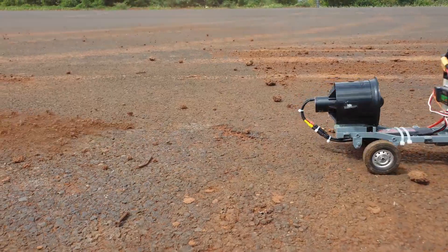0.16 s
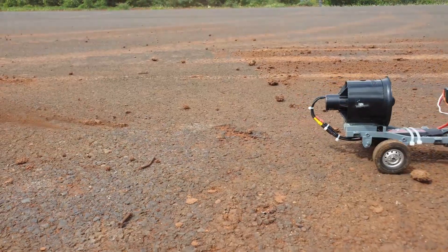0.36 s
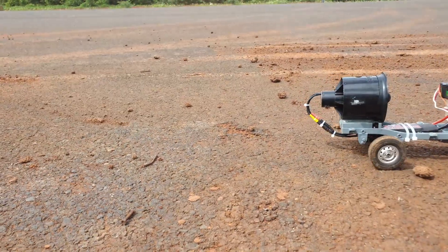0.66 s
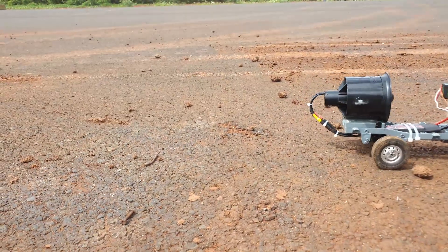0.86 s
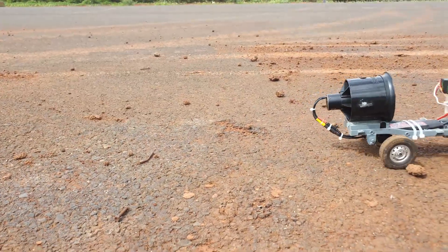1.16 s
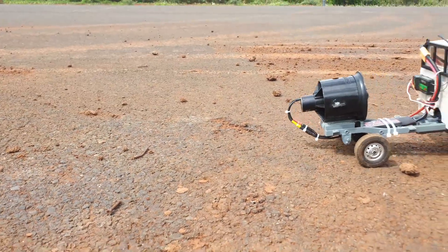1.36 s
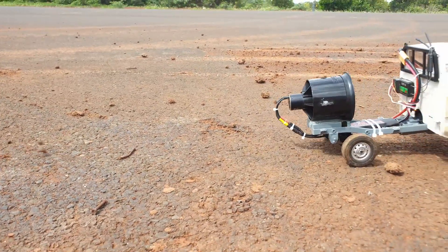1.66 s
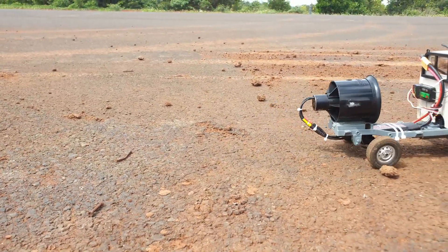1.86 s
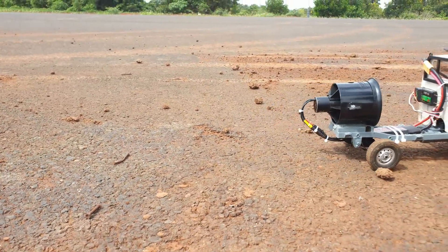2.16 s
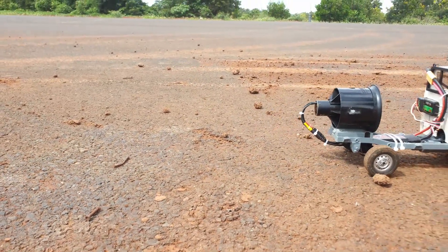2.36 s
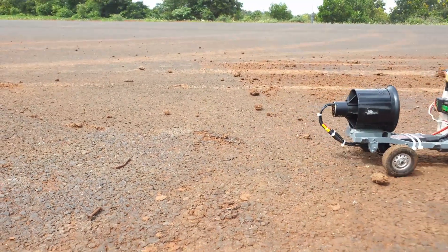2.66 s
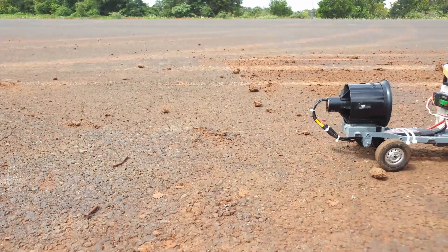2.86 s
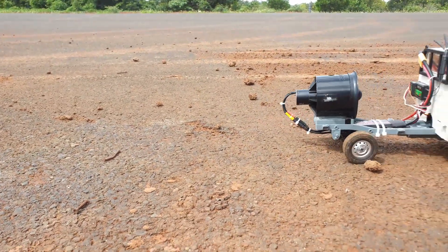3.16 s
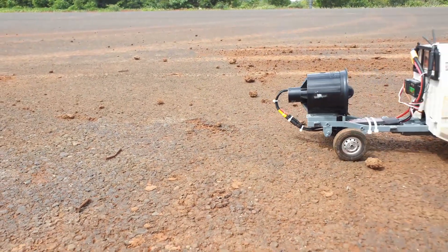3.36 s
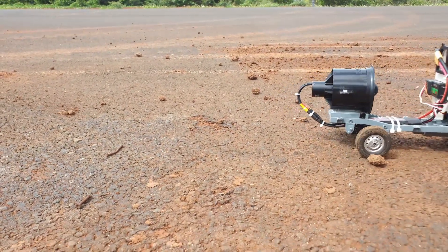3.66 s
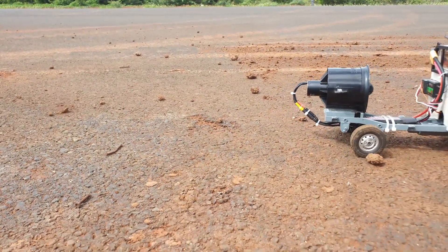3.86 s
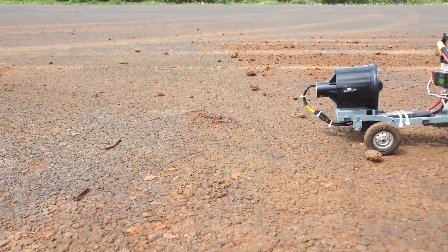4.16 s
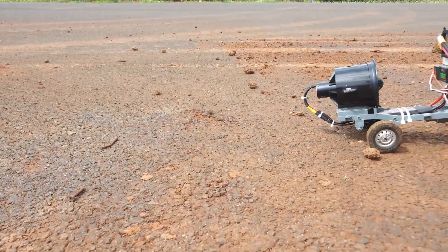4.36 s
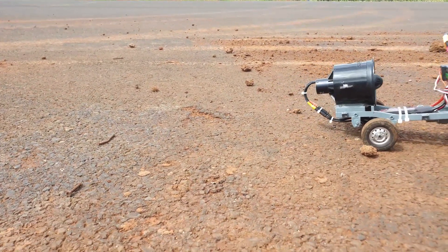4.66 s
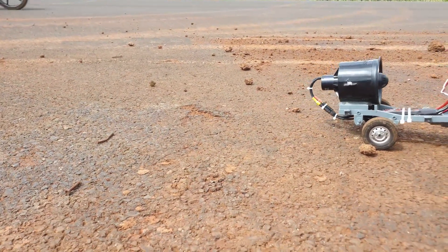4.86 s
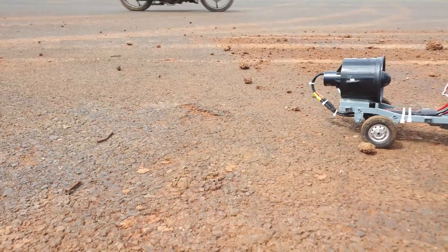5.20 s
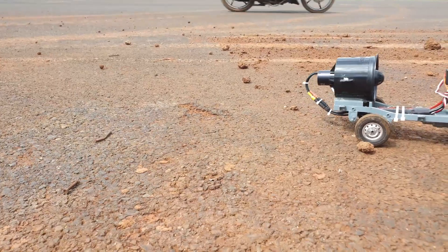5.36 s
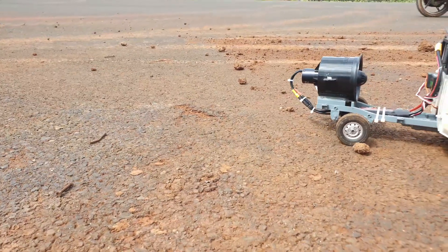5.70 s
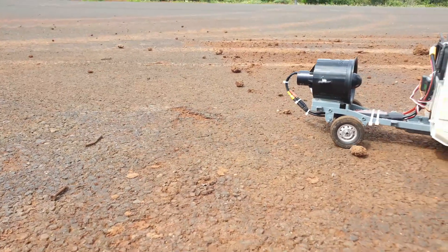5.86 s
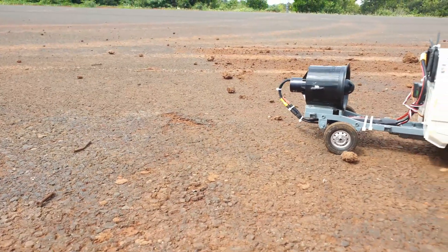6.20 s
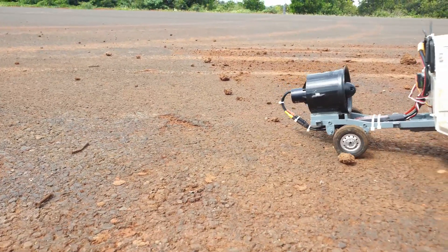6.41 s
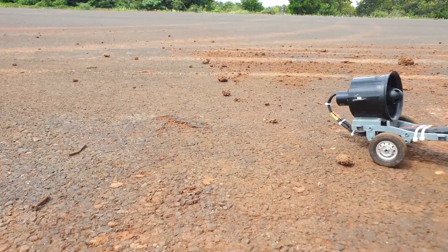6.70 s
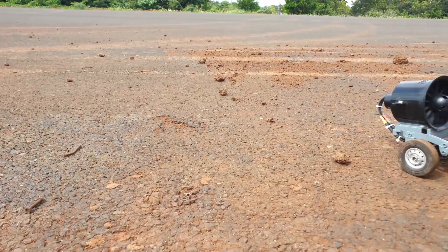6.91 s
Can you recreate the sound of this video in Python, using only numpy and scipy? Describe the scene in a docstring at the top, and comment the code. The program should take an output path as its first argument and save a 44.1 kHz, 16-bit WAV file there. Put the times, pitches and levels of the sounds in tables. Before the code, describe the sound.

A small electric ducted fan close by whines up three times to a piercing rushing pitch and winds down, as a motorbike thumps past outdoors.

```python
"""Open ground: a model car's twelve-blade electric ducted fan is throttled up three times, close by.
Blade tones and shaft orders sweep through the duct's resonances over rushing air (shaped noise), and the motor
bearings whirr. At part throttle the speed controller whistles: a steady sine with a moving sideband.
A single-cylinder motorbike, made of filtered firing pulses and hiss, thumps past behind the fan.
Short bursts of filtered noise make the grit that ticks, mostly as the fan runs down."""
import sys
import numpy as np
from scipy import signal
from scipy.fft import rfft, irfft
from scipy.io import wavfile

SR = 44100
rng = np.random.default_rng(int(sys.argv[2]) if len(sys.argv) > 2 else 0)


def digitize_waveform(pressure):
    """Quantize a signal to 16-bit integers and store it at the path in sys.argv[1].

    Rows of a 2-D input are taken as channels; values are limited to [-1, 1].
    """
    field = np.atleast_2d(pressure).T
    bounded = np.clip(field, -1, 1)
    quanta = np.round(bounded * 32767).astype(np.int16)
    wavfile.write(sys.argv[1], SR, quanta)


N = 310464
TIME = np.arange(N) / SR

# open air, before a slow wander: pitch_hz, left_db per Hz, right_db per Hz, correlation (left-right)
OPEN_AIR_SPECTRUM = [(20, -108, -110, .6), (55, -73, -76.5, 0.86), (119, -79, -81.5, 1),
                     (330, -88.5, -89.5, 0.47), (627, -93, -102.5, 0.7), (900, -91.5, -101.5, 0.48),
                     (1400, -102, -113, 0.49), (2200, -94.5, -107.5, 0.9), (3280, -113, -113, 0.34),
                     (5000, -112, -112, 0.25), (8000, -118, -118, .2), (15000, -120, -120, 0.23)]

# motorbike engine speed: time_s, firings_hz
BIKE_FIRING_RATE = [(0, 16), (4.15, 15.3), (4.45, 13.9), (4.9, 13.4), (6.05, 12.65), (6.35, 11.35),
                    (6.9, 12.5)]
# rise and fall of the bike's tyre and chain hiss: time_s, gain_db
BIKE_HISS_GAIN = [(0, -24), (3.2, -6.5), (4.5, 10.5), (5.5, 4.5), (5.9, -2), (6.25, -9.5), (6.4, -17.5),
                  (6.6, -18.5), (7.04, -20)]
# colour of that hiss, before its gain: pitch_hz, left_db per Hz, right_db per Hz, correlation (left-right)
BIKE_HISS_SPECTRUM = [(200, -90, -85.5, 0.65), (600, -84.5, -91, 0.79), (1000, -79.5, -82, 0.38),
                      (2146.4, -83.5, -93, 0.16), (3100, -94.5, -95.5, 0.3), (4670, -111.5, -86.5, 0.38),
                      (7500, -101, -101, 0.16), (11700, -96, -87.5, .3), (15000, -99, -93.5, .3)]

# grit under the wheels: start_s, peak_db, centre_hz, decay_s
GRIT_TICKS = [(5.549, -44, 11870, .004), (6.262, -48, 10930, 0.0036), (6.371, -50.5, 6940, .003),
              (6.792, -37.5, 7060, 0.0018), (6.830, -47, 7000, 0.0016), (6.866, -54, 2100, .005),
              (6.875, -48, 2100, 0.0083), (6.877, -45, 6000, 0.0035), (6.904, -49, 12000, .004),
              (6.942, -58, 1630, .008)]

# controller chopping at part throttle: start_s, end_s, left_db, right_db (carrier peak, before its wander)
CHOPPING_SPELLS = [(-.02, 0.173, -69, -37.5), (1.387, 1.67, -48, -39), (3.145, 3.472, -59, -39.5),
                   (5.24, 5.38, -55, -42)]

# motor bearings ringing the housing: centre_hz, width_hz (first of two passes), level_db (relative)
HOUSING_MODES = [(1041, 710, -7), (1886, 50, -2.5), (2464, 250, -3), (5200, 1800, -12.5)]

# throttle bursts: opens_s, full_s, eases_s, opening_rate (Hz per s), closing_s,
# octave_db (hum's octave at full speed), high_rush_db (treble gain); surge adds to both levels
THROTTLE_BURSTS = [(-.269, .186, .954, 792, .368, -37, -5), (1.291, 1.665, 2.528, 930, .382, -37.5, -7.5),
                   (3.101, 3.45, 5.185, 1037, .451, -38, -6.5)]
# the battery sags under load, one curve a burst: time_s, pitch_hz (second blade tone asked for at full throttle)
BATTERY_SAG = [
    [(0.27, 10454), (0.348, 10531), (0.564, 10484), (0.71, 10541), (0.96, 10444)],
    [(1.73, 10448), (1.972, 10473), (2.54, 10432)],
    [(3.52, 10446), (3.668, 10473), (4.22, 10393), (5.2, 10357)],
]

# rushing air at full speed, before gains: pitch_hz, left_db per Hz, right_db per Hz, correlation (left-right)
RUSH_SPECTRUM = [(30.16, -103, -105, .45), (100, -74, -78, 0.6), (272, -83.5, -83, -0.12),
                 (574, -75, -80.5, 1), (750, -71.5, -73.5, 0.3), (1100, -70.5, -76, 0.97),
                 (1740, -67.5, -79.5, 0.78), (2197, -75.5, -79, 0.46), (2900, -81.5, -79, 1),
                 (3295, -68, -65.5, .93), (3650, -67, -63.5, 0.43), (5000, -71.5, -63, 0.65),
                 (6620, -74.5, -62.5, -0.36), (8000, -71, -67, -0.4), (9940, -61, -61.5, -0.38),
                 (12160, -62.5, -60, -0.35), (15200, -68.5, -68, .3)]

# how well the duct radiates a tone: pitch_hz, gain_db
DUCT_RESPONSE = [(200, -10.5), (430, 10), (1000, 25), (1500, 18), (2400, 18), (3400, 12.5), (4200, 14),
                 (5200, 8), (6300, 2), (8000, -8), (9300, 6), (10400, 18.5), (11500, -1.5), (13000, 8.5),
                 (15600, -1.5)]
# overtones of the slightly unequal blades at full speed: shaft_order, left_db, right_db
BUZZ_ORDERS = [(3, -46.5, -47.5), (4, -51.5, -50), (5, -47, -48.5), (6, -51, -49.5), (7, -47.5, -50.5),
               (8, -42, -36), (9, -46, -41.5), (10, -52.5, -54.5), (11, -46, -39), (13, -41.5, -39),
               (14, -57.5, -47), (15, -45.5, -43.5), (18, -57.5, -50), (23, -33, -34), (25, -40, -36.5),
               (26, -50.5, -43), (27, -48, -40.5), (28, -54, -46.5), (30, -58.5, -43)]
# hum at the shaft rate, one curve a burst: time_s, level_db (at full speed, midway between the ports)
SHAFT_HUM = [
    [(0.27, -33), (0.744, -38), (0.78, -37), (0.96, -36)],
    [(1.73, -36), (2.096, -40.5), (2.42, -38.5), (2.54, -38)],
    [(3.52, -35.5), (3.782, -37.5), (3.88, -33.5), (5.2, -32)],
]
# blade tones are beamed unevenly as the car shifts, one curve a burst:
# time_s, level_db (at full speed, before the trim in BLADE_TONE_SETTINGS), pan_db (left minus right)
FIRST_BLADE_BEAM = [
    [(0.24, -30.5, 0), (0.312, -34.5, 2.5), (0.462, -39, 4), (0.524, -32, -9), (0.598, -45, 7),
     (0.97, -28.5, -4.5)],
    [(1.71, -28.5, -11), (1.752, -39.5, -6.5), (1.958, -20.5, -17), (2.116, -27.5, -10.5),
     (2.274, -25, -10.5), (2.54, -29.5, -8.5)],
    [(3.49, -35.5, -6.5), (3.566, -28, -3.5), (3.936, -25, -6.5), (4.408, -35, 4), (4.952, -23.5, -24),
     (5.2, -33.5, -2.5)],
]
SECOND_BLADE_BEAM = [
    [(0.26, -17, -2.5), (0.352, -21, -13), (0.406, -15.5, -8), (0.56, -20.5, -6), (0.658, -19, -9),
     (0.824, -19.5, -5.5), (0.97, -19.5, -14)],
    [(1.73, -20, -8.5), (1.776, -22.5, -12), (1.862, -25, -16), (1.952, -21, -21.5), (2.094, -24, -8.5),
     (2.194, -23, -9), (2.54, -17.5, -4)],
    [(3.51, -26, 5), (3.618, -22, -3), (3.734, -22.5, -3.0), (3.998, -24, 11.0), (4.216, -23, 2.0),
     (4.564, -22, -4), (5.2, -19, 0)],
]
THIRD_BLADE_BEAM = [
    [(0.27, -41, -2.5), (0.582, -41.5, -1), (0.64, -59.5, -6), (0.96, -44, -5.5)],
    [(1.73, -44.5, -10), (2.08, -45, -7), (2.168, -44.5, -3), (2.54, -44, -12.5)],
    [(3.52, -48, -5), (4.342, -27.5, 5.5), (4.89, -37.5, -5), (5.2, -42, -10)],
]
# the three blade tones: lead_rad (phase lead at the left port), trim_db (when beamed), even_db (when spread evenly)
BLADE_TONE_SETTINGS = [(1.94, -1.6, -31.5), (-0.558, 0.45, -14), (-.3, .5, -48)]

# full speed is in shaft turns per second; the controller chops at CHOP_HZ; a steep low-pass cuts at TOP_HZ
BLADES, FULL_HZ, CHOP_HZ, TOP_HZ = 12, 435, 8000, 15850
# the rotor: lag behind the throttle, air drag (Hz per s, per Hz squared) and bearing friction
SPOOL_S, DRAG, FRICTION_HZ_PER_S = .0177, .021, 12
# freshly started air is rough and loud, then settles
SETTLE_S, SURGE_HUM_DB, SURGE_LOW_DB, SURGE_HIGH_DB = 0.16, 0.5, 1.8, 1
# shaft speeds between which the blade tones narrow into beams
EVEN_HZ, BEAMED_HZ = 199, 304
# the fan is off to the right, so it reaches the left port late
PORT_LAG_S = .000133
# the bike's pass: when nearest, speed, distance then, thump level then, extra level straight behind it
PASS_S, BIKE_M_PER_S, ROAD_M, EXHAUST_DB, ASTERN_DB = 5.24, 6.7, 5.64, -42.5, 3
# exhaust loss over open ground for each tenfold distance
FALL_DB = 34.5
# the rider lifts off for a moment
LIFT_S, LIFT_LENGTH_S, LIFT_DB = 6.28, 0.12, -5.5


def undb(db):
    """Decibels to gain."""
    return 10 ** (np.asarray(db) / 20)


def stereo(left, right):
    """Left and right settings stacked to apply across time."""
    return np.array([[left], [right]])


def unit(x):
    """Scale to rms 1."""
    return x / np.sqrt(np.mean(x ** 2))


def curves(table):
    """The columns of a timed table, one value per sample."""
    s, *columns = np.transpose(table)
    return np.array([np.interp(TIME, s, c) for c in columns])


def joined(bursts):
    """One curve a burst, joined into columns with a value per sample."""
    return curves([row for burst in bursts for row in burst])


def colour(table, hz):
    """The columns of a spectrum, read on a log-frequency axis."""
    points, *columns = np.transpose(table)
    return np.array([np.interp(np.log(hz + 1), np.log(points), c) for c in columns])


def walk(rate):
    """A random wander through this many points a second; spread near 1."""
    steps = TIME * rate
    return 1.2 * np.interp(steps, np.arange(12000), rng.standard_normal(12000))


def band(x, hz, width):
    """A resonance with gain 1 at its centre."""
    centre = min(hz, .45 * SR)
    sharpness = hz / min(width, .4 * SR)
    return signal.lfilter(*signal.iirpeak(centre, sharpness, fs=SR), x)


def air(table):
    """Stereo noise with the given density and correlation, mixed from independent mid and side."""
    left_db, right_db, alike = colour(table, np.fft.rfftfreq(N, 1 / SR))
    alike = np.clip(alike, -.98, .98)
    mid, side = rfft(rng.standard_normal((2, N))) * np.sqrt([1 + alike, 1 - alike])
    left = (mid + side) * undb(left_db)
    right = (mid - side) * undb(right_db)
    return irfft(np.array([left, right]), N) * np.sqrt(SR) / 2


def left_late(x):
    """Delay the left channel by the path between the ports."""
    delay = np.exp(-2j * np.pi * np.fft.rfftfreq(N, 1 / SR) * PORT_LAG_S)
    return np.array([irfft(rfft(x[0]) * delay, N), x[1]])


def open_air():
    """Outdoor background: shaped noise whose level wanders slowly."""
    return air(OPEN_AIR_SPECTRUM) * undb(walk(3.7))


def passing_db():
    """The exhaust's level: it falls with distance, is louder from astern, and dips as the rider lifts off."""
    along = BIKE_M_PER_S * (TIME - PASS_S)
    distance = np.hypot(along, ROAD_M)
    lift = np.exp(-((TIME - LIFT_S) / LIFT_LENGTH_S) ** 2)
    distance_db = -FALL_DB * np.log10(distance / ROAD_M)
    return EXHAUST_DB + distance_db + ASTERN_DB * along / distance + LIFT_DB * lift


def motorbike(low_hz=74, high_hz=124, second_s=.021, second=0.34, uneven_db=2, bark_db=-12, bark_hz=270):
    """Each firing thumps the silencer and puffs gas; tyres and chain hiss as it goes by."""
    cycles = np.cumsum(curves(BIKE_FIRING_RATE)[0]) / SR
    # one firing lands at this moment
    cycles -= np.interp(5.499, TIME, cycles)
    count = np.floor(cycles)

    # strong and weak firings alternate; the weak ones carry a stronger second beat
    weak = count % 2
    firing_db = uneven_db * (1 - 2 * weak) + .5 * walk(51)
    firings = np.diff(count, prepend=count[0]) * undb(firing_db)
    pulses = firings + second * (1 + weak) * np.roll(firings, int(second_s * SR))
    silencer = signal.butter(2, [low_hz, high_hz], "bandpass", fs=SR, output="sos")
    thump = unit(signal.sosfilt(silencer, pulses))

    # gas noise starts afresh at each firing and fades over the cycle
    puff = rng.standard_normal(N) * np.exp(-(cycles % 1) / 0.74)
    rumble = undb(-10) * unit(band(band(puff, 75, 90), 75, 120))
    bark = undb(bark_db) * unit(band(band(puff, bark_hz, 400), bark_hz, 720))
    exhaust = (thump + rumble + bark) * undb(passing_db())

    # each power stroke snatches the chain
    snatch_db = 1.0 * np.cos(2 * np.pi * (cycles - .2))
    hiss_db = curves(BIKE_HISS_GAIN)[0] + snatch_db + 2.73 * walk(70)
    rolling = air(BIKE_HISS_SPECTRUM) * undb(hiss_db)
    return exhaust * undb(stereo(1.1, -1.1)) + rolling


def grit():
    """Small stones snap and scrape: short bursts of noise."""
    out = np.zeros((2, N))
    age = TIME[:SR // 16]
    for start_s, peak_db, hz, decay_s in GRIT_TICKS:
        envelope = np.exp(-age / decay_s) * (1 - np.exp(-age / 0.0007))
        snap = band(rng.standard_normal((2, len(age))) * envelope, hz, 1.7 * hz)
        # each side hears half of the other
        snap = snap + .5 * snap[::-1]
        snap = snap * undb(peak_db) / np.abs(snap).max()
        start = int(start_s * SR)
        out[:, start:start + len(age)] += snap[:, :N - start]
    return out


def shaft_speed(count=7040):
    """Turns per second: the motor pulls the rotor up to the throttle's demand; only drag and friction slow it."""
    t = np.linspace(0, TIME[-1], count)
    full_hz = np.interp(t, TIME, joined(BATTERY_SAG)[0]) / (2 * BLADES)
    demand = np.zeros(count)
    for opens, full, eases, rate, closing, *_ in THROTTLE_BURSTS:
        opening_hz = (t - opens) * rate
        held_hz = full_hz * np.minimum(1, 1 - (t - eases) / closing)
        demand = np.maximum(demand, np.where(t < full, opening_hz, held_hz))
    hz = [demand[0]]
    for wanted in demand[:-1]:
        pull = (wanted - hz[-1]) / SPOOL_S
        coasting = -DRAG * hz[-1] ** 2 - FRICTION_HZ_PER_S
        hz.append(hz[-1] + t[1] * max(pull, coasting))
    return np.maximum(np.interp(TIME, t, hz), 1)


def surge():
    """Roughness of the inflow, 0-1: it builds while the throttle opens and dies away at full throttle."""
    total = 0
    for opens, full, *_ in THROTTLE_BURSTS:
        build = np.interp(TIME, [opens, full], [0, 1])
        total = total + build * np.exp(-np.maximum(TIME - full, 0) / SETTLE_S)
    return total


def burst_levels():
    """The hum's octave and the high rush in dB, held through each burst."""
    return curves([(s, *levels) for _, full, eases, _, _, *levels in THROTTLE_BURSTS for s in (full, eases)])


def controller(hz, sideband_db=-6, fade_s=0.23):
    """The switching whistle, with a sideband that climbs with the motor's commutation."""
    carrier = 2 * np.pi * CHOP_HZ * TIME
    # the sideband sits twelve shaft rates above the carrier
    poles = 2 * np.pi * BLADES * np.cumsum(hz) / SR
    out = 0
    for start, end, left_db, right_db in CHOPPING_SPELLS:
        gate = np.interp(TIME, [start - .01, start + 0.097, end - .04, end + .01], [0, 1, 1, 0])
        fade = np.exp(-np.abs(TIME - start) / fade_s)
        sideband = undb(sideband_db) * fade * np.sin(carrier + poles)
        out = out + undb(stereo(left_db, right_db)) * gate * (np.sin(carrier) + sideband)
    return out * undb(walk(25))


def bearings(hz, db=-46, slope_db=18):
    """The motor's bearings whirr in the housing, heard when the fan idles."""
    rub = rng.standard_normal((2, N))
    ring = 0
    for centre_hz, width, mode_db in HOUSING_MODES:
        ring = ring + undb(mode_db) * band(band(rub, centre_hz, width), centre_hz, 2 * width)
    # they fall silent as the rotor comes to rest
    turning = np.minimum(hz / 65, 1) ** 2
    return unit(ring) * undb(db + slope_db * np.log10(hz / FULL_HZ)) * turning


def fan_rush(hz, body_db=0.74, low_slope_db=46, high_slope_db=64, split_hz=5500, churn_db=1.25, chop=0.24,
             build_s=0.059):
    """Turbulent air: the treble rises faster with speed than the body, and pulses once a turn."""
    low_db = body_db + SURGE_LOW_DB * surge()
    high_db = burst_levels()[1] + SURGE_HIGH_DB * surge()

    # the jet takes a moment to follow the rotor, but stays at least a little ahead of it
    keep = np.exp(-1 / (build_s * SR))
    lagging_hz = hz[0] + signal.lfilter([1 - keep], [1, -keep], hz - hz[0])
    jet_hz = np.maximum(lagging_hz, 1.047 * hz)

    rush = left_late(air(RUSH_SPECTRUM))
    low = signal.sosfiltfilt(signal.butter(2, split_hz, fs=SR, output="sos"), rush)
    high = rush - low
    turn = 1 + chop * np.sin(2 * np.pi * np.cumsum(hz) / SR)
    low_db = low_db + low_slope_db * np.log10((hz + jet_hz) / 2 / FULL_HZ) + churn_db * walk(50)
    high_db = high_db + high_slope_db * np.log10(jet_hz / FULL_HZ) + churn_db * walk(60)
    return low * undb(low_db) + high * turn * undb(high_db)


def beam(bursts, lead):
    """Left and right dB of a blade tone whose in-phase mean over the two ports has the given level."""
    db, pan_db = joined(bursts)
    sides_db = np.array([pan_db, -pan_db]) / 2
    left, right = undb(sides_db)
    mean = np.abs(left * np.exp(1j * lead) + right) / 2
    return db + sides_db - 20 * np.log10(mean)


def fan_tones(hz, blade_slope_db=52, buzz_slope_db=150, flutter_db=0.5, blade_flutter_db=1.47, wobble=.0009,
              smear=0.05, idle_hz=290, idle_slope_db=92, idle_loss_db=6, waver_db=0.52):
    """Blade tones and shaft orders: they grow steeply with speed and flare as they cross duct resonances."""
    # slopes are in dB per tenfold speed
    speed = np.log10(hz / FULL_HZ)
    # below full speed the flow over the blades is less steady
    unsteady = 1 + 4 * np.minimum(-speed, .2)
    drift = wobble * (unsteady ** 3 * walk(90) + walk(9))
    angle = 2 * np.pi * np.cumsum(hz * (1 + drift)) / SR
    speeds = np.arange(1, 2 * FULL_HZ)

    def tone(order, db, flicker_db, lead):
        """One multiple of the shaft rate, with a phase lead at the left port."""
        duct = colour(DUCT_RESPONSE, order * speeds)[0]
        # duct gain relative to that at full speed
        db = db + np.interp(hz, speeds, duct - duct[FULL_HZ - 1])
        # eddies drawn into the intake shake each tone's strength and phase
        db = db + flicker_db * unsteady * walk(75)
        # each tone starts at a random phase, so the orders do not peak together
        offset = rng.uniform(0, 2 * np.pi)
        phase = angle * order + offset + smear * unsteady * walk(150) + stereo(lead, 0)
        return np.sqrt(2) * undb(db) * np.sin(phase)

    hum_db = joined(SHAFT_HUM)[0]
    octave_db = burst_levels()[0] + SURGE_HUM_DB * surge()
    out = tone(1, hum_db + 60 * speed + stereo(.6, -.6), 0.85, -0.26)
    out += tone(2, octave_db + 210 * speed + stereo(1.8, -1.8), flutter_db, -1.0)

    # an idling fan keeps only its lowest blade tone, a little weakened
    idle_db = idle_slope_db * np.log10(np.minimum(hz / idle_hz, 1))
    lowest_idle_db = np.maximum(idle_db / 2, -idle_loss_db)
    # only a fast fan beams its tones; a slow one spreads them evenly
    beamed = np.clip((hz - EVEN_HZ) / (BEAMED_HZ - EVEN_HZ), 0, 1)
    beams = (FIRST_BLADE_BEAM, SECOND_BLADE_BEAM, THIRD_BLADE_BEAM)
    for k, (bursts, (lead, trim_db, even_db)) in enumerate(zip(beams, BLADE_TONE_SETTINGS)):
        ports_db = np.array([walk(70), walk(70)]) + 0.78 * walk(500) + waver_db * unsteady * walk(22)
        aimed_db = beamed * (beam(bursts, lead) + trim_db) + (1 - beamed) * even_db
        db = aimed_db + ports_db + blade_slope_db * speed + (idle_db if k else lowest_idle_db)
        out += tone(BLADES * (k + 1), db, flutter_db if k else blade_flutter_db, lead)

    for order, left_db, right_db in BUZZ_ORDERS:
        lead = -2 * np.pi * order * FULL_HZ * PORT_LAG_S
        out += tone(order, stereo(left_db, right_db) + buzz_slope_db * speed, 2.6, lead)
    return out


def scene():
    """Open air all round, the motorbike passing behind, the fan close by."""
    hz = shaft_speed()
    background = open_air() + motorbike() + grit()
    fan = controller(hz) + bearings(hz) + fan_rush(hz) + fan_tones(hz)
    return background + fan


def record(dry):
    """Cut the top with a steep low-pass."""
    return signal.sosfilt(signal.ellip(12, .2, 80, TOP_HZ, fs=SR, output="sos"), dry)


dry = scene()
out = record(dry)
digitize_waveform(out)
```